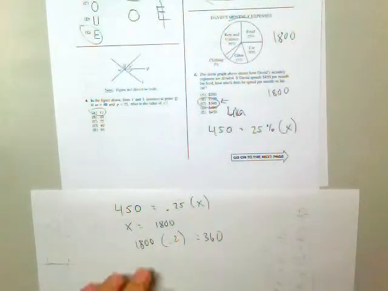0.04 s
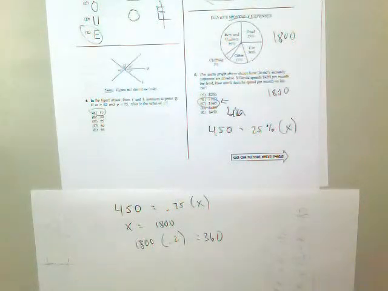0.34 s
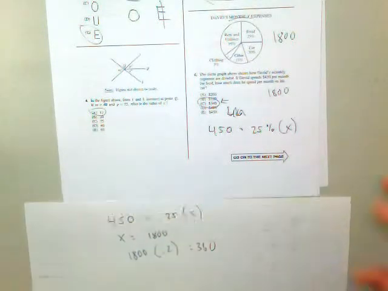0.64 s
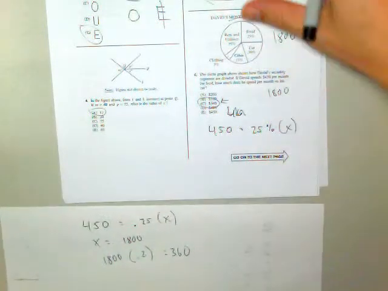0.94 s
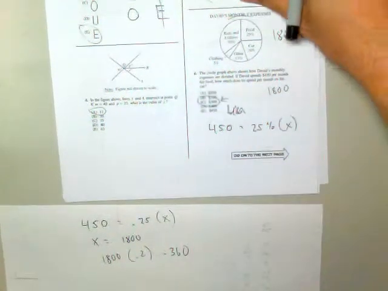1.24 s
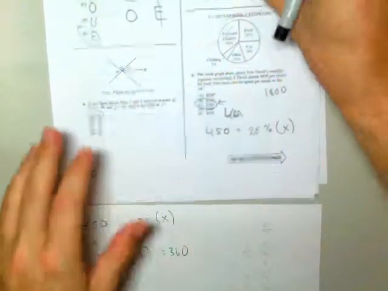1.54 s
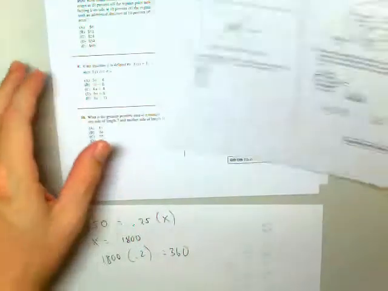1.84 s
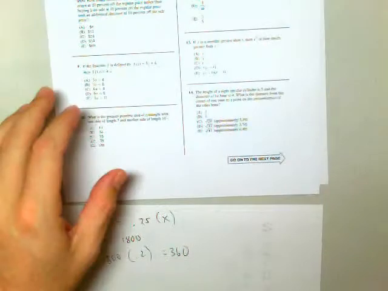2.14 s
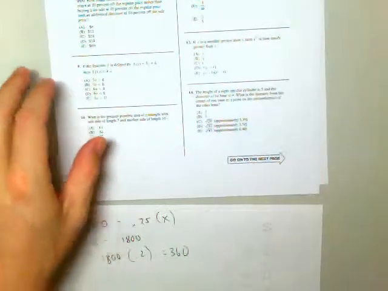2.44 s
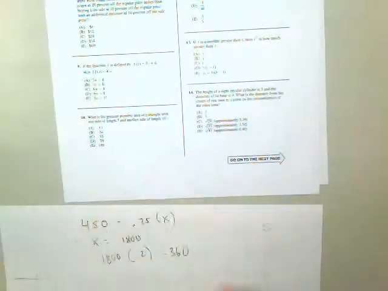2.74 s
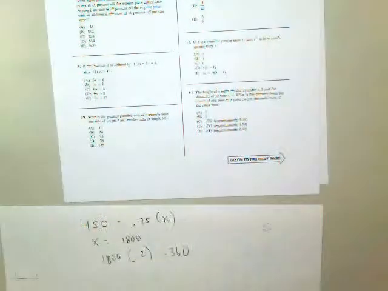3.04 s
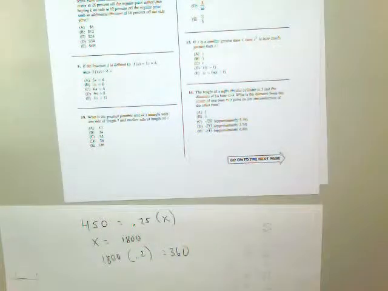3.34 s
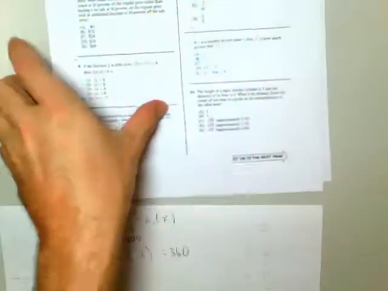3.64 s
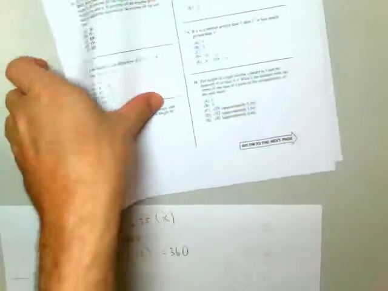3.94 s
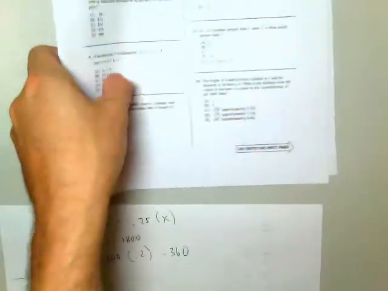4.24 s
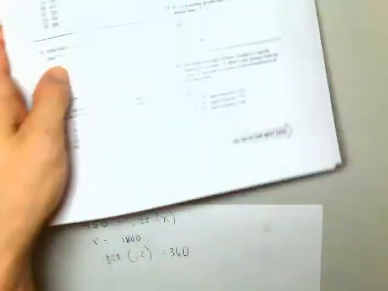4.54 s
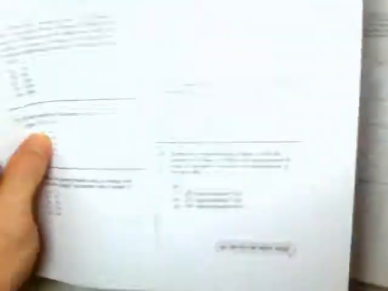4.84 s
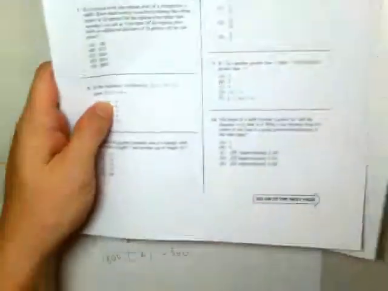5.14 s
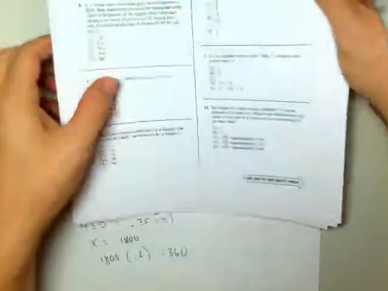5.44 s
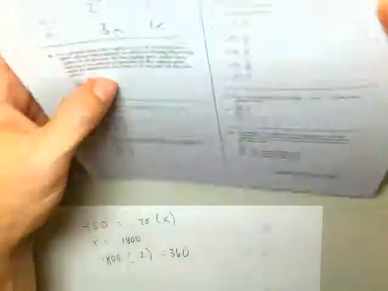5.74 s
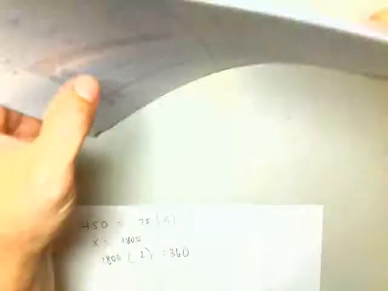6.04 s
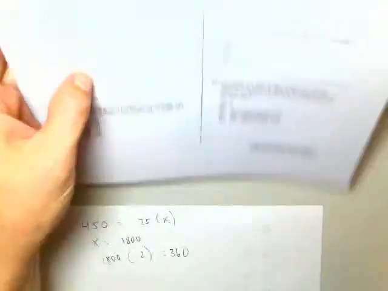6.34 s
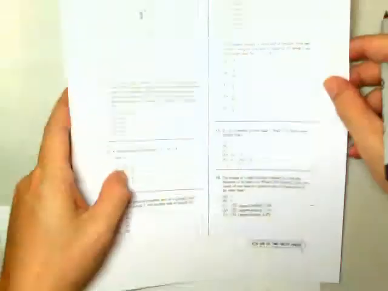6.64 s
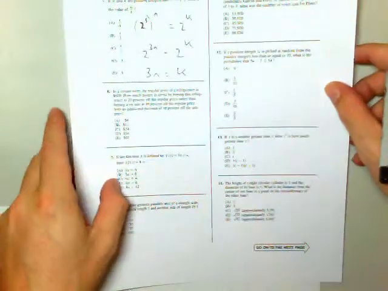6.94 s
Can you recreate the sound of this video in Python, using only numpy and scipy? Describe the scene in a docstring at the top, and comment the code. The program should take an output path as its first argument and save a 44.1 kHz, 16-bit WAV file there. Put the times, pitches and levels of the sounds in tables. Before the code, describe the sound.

Sheets of paper slide and rustle on a desk, with a hand thump and a knock of the stack over a faint hum.

```python
"""Over a faint mains hum, paper ticks and slides across a desk, close up in a small, quiet room.
Sheets are pushed aside and picked up: their fibres hiss and rustle, bent panels snap, skin squeaks.
A hand thumps the desk and shoves the stack into a judder. Near the end the stack is knocked square,
ringing the desk and fanning air at the microphone."""
import sys
import numpy as np
from scipy import signal
from scipy.fft import rfft, irfft, next_fast_len
from scipy.io import wavfile
from scipy.ndimage import uniform_filter1d

SR = 44100
rng = np.random.default_rng(int(sys.argv[2]) if len(sys.argv) > 2 else 0)


def dump_mix(stems):
    """Bounce the given channels to the path in sys.argv[1] as a 16-bit WAV at rate SR."""
    frames = np.atleast_2d(stems).T  # one column per channel
    limited = np.clip(frames, -1, 1)  # hard clip at full scale
    pcm = np.round(limited * 32767).astype(np.int16)
    wavfile.write(sys.argv[1], SR, pcm)


N = 316227
TIME = np.arange(N) / SR
HIT = TIME[:16384]  # time axis of one impact


def undb(db):
    """Decibels to gain."""
    return 10 ** (np.asarray(db) / 20)


def unit(x):
    """Scale to rms 1."""
    return x / np.sqrt(np.mean(x ** 2))


def peak(x):
    """Scale to a peak of 1."""
    return x / np.abs(x).max()


def crest(x):
    """Scale so that the loudest two milliseconds have rms 1."""
    return x / np.sqrt(uniform_filter1d(x ** 2, size=88).max())


def add(out, s, x):
    """Mix x into out from time s."""
    i = int(s * SR)
    out[i:i + len(x)] += x[:N - i]


def colour(x, points):
    """Minimum-phase EQ through (f/Hz, level/dB) points."""
    n = 2 * next_fast_len(len(x) // 2 + 1)
    hz, db = np.transpose(points)
    log_hz = np.log(np.maximum(np.arange(n // 2 + 1) * SR / n, 1))
    gain = undb(np.interp(log_hz, np.log(hz), db))
    cepstrum = irfft(np.log(gain))
    cepstrum[1:n // 2] *= 2
    cepstrum[n // 2 + 1:] = 0
    return irfft(rfft(x, n) * np.exp(rfft(cepstrum)))[:len(x)]


def band(x, low_hz, high_hz, order=2):
    """Band-pass between two edges."""
    return signal.sosfilt(signal.butter(order, [low_hz, high_hz], "band", fs=SR, output="sos"), x)


def grains(count, rate, spread_db):
    """Fibres catching and letting go: random clicks, rate a second, uneven in size."""
    sizes = undb(spread_db * np.minimum(rng.exponential(size=count), 5))
    return unit(rng.standard_normal(count) * sizes * (rng.random(count) < rate / SR))


def walk(rate):
    """Smooth random modulator of rms 1, with rate new targets a second."""
    hold = int(SR / rate)
    steps = np.repeat(rng.standard_normal(N // hold + 1), hold)
    return unit(uniform_filter1d(steps, hold)[:N])


def swell(start, fastest, end, attack_power=1.14, release_power=2.1):
    """Speed of one hand movement: it rises smoothly to 1 and falls back to rest."""
    t = TIME[:int((end - start) * SR)] + start
    arc = np.sin(np.pi / 2 * np.interp(t, [start, fastest, end], [0, 1, 0]))
    return arc ** np.where(t < fastest, attack_power, release_power)


def burst(t, build_s, decay_s):
    """Envelope that grows up to t = 0 and dies away after it."""
    return np.exp(-np.maximum(-t / build_s, t / decay_s))


def ring(modes):
    """Free ringing of (f/Hz, level/dB, t60/s) modes."""
    return sum(undb(db - 60 * HIT / t60) * np.sin(2 * np.pi * hz * HIT) for hz, db, t60 in modes)


def room_tone(mains_hz=60):
    """The bed: mains hum over soft room air, microphone hiss and low rumble."""
    # hum partials: harmonic number, rms level/dB
    partials = [(1, -36.5), (2, -63), (3, -62.5), (5, -66.5), (7, -69.5)]
    # spectrum of air and hiss: f/Hz, level/dB
    air_eq = [(65, -34), (110, -8.5), (181, -6.5), (442, -11), (544, -12), (603, -12.5), (1010, -18),
              (1440, -18), (2140, -23), (3750, -25), (15700, -31.5)]
    hum = sum(np.sqrt(2) * undb(db) * np.sin(2 * np.pi * (k * mains_hz * TIME + rng.random()))
              for k, db in partials)
    air = unit(colour(rng.standard_normal(N), air_eq)) * undb(-52 + 0.063 * walk(4.1))
    rumble = unit(band(rng.standard_normal(N), 5.8, 97)) * undb(-49.5)
    return hum + air + rumble


def ticks(treble_db=-6):
    """A paper edge or fingernail meets the desk: one sharp contact with a brief flutter."""
    # contacts: t/s, peak level/dB
    cues = [(0.466, -36), (1.497, -27.5), (2.052, -16.5), (2.074, -19.5), (2.155, -24.5), (2.858, -33.5),
            (3.722, -15.5), (4.002, -30.5), (4.095, -19), (5.645, -29), (5.867, -32.5), (6.308, -20),
            (6.345, -8), (6.952, -31.5)]
    out = np.zeros(N)
    for s, db in cues:
        contact = undb(-17) * rng.standard_normal(len(HIT)) * np.exp(-HIT / 0.003)
        contact[0] += 1
        knock = peak(band(contact, 410, 1890))
        click = peak(band(contact, 4000, 7400, order=1))
        add(out, s, undb(db) * peak(knock - undb(treble_db) * click))
    return out


def flicker(x, depth_db=3.0, rate=55):
    """Each octave from 1 to 16 kHz swells and fades on its own as the contact patch moves."""
    spectrum = rfft(x)
    octave = np.log2(np.maximum(np.arange(N // 2 + 1) * SR / N, 1) / 1000)
    bands = (irfft(spectrum * np.maximum(1 - np.abs(octave - k), 0), N) for k in range(5))
    return unit(sum(part * undb(depth_db * walk(rate)) for part in bands))


def whistle():
    """A thin, patchy whistle of narrow-band noise rides on the opening slides."""
    # fader points: t/s, level/dB
    fader = [(.5, -73), (.6, -66), (1.6, -65), (2.1, -63)]
    times, db = np.transpose(fader)
    gain = undb(np.interp(TIME, times, db, left=-150, right=-150))
    tone = unit(band(rng.standard_normal(N), 6330, 6520))
    return tone * gain * unit(undb(-1.5 * walk(15.1)))


def sliding(kink_db=-9.5, blur_db=-48):
    """Fibre friction hisses with the speed of each stroke; the free part of the sheet rustles."""
    # strokes of a sheet: start/s, fastest/s, end/s, hiss/dB, rustle/dB, rustle pitch/Hz
    strokes = [(0.499, .59, 0.78, -54, -55.5, 3800), (0.683, 0.822, 1.21, -53.5, -59.5, 1600),
               (1.305, 1.362, 1.53, -61, -42.5, 3130), (1.301, 1.467, 1.604, -38, -51, 1490),
               (1.478, 1.64, 2.01, -46, -53.5, 2610), (1.679, 2.0, 2.45, -50, -51, 1480),
               (2.061, 2.08, 2.42, -62, -48.5, 630), (2.856, 2.858, 3.23, -58, -57.5, 1100),
               (3.718, 3.708, 3.95, -47, -42.5, 4340), (3.992, 4.05, 4.36, -48.5, -54, 1000),
               (4.151, 4.39, 4.754, -41.5, -43.5, 1540), (5.022, 5.026, 5.29, -44.5, -67, 950),
               (4.851, 5.18, 5.47, -56.5, -48.5, 845), (5.168, 5.181, 5.404, -36, -45, 2130),
               (5.36, 5.47, 5.69, -48, -48, 1230), (5.622, 5.71, 5.86, -44.5, -52, 930),
               (5.866, 5.863, 6, -51, -58, 1500), (6.198, 6.28, 6.49, -46.5, -49, 2610),
               (6.523, 6.593, 6.75, -52, -51.5, 800), (6.713, 6.764, 7.15, -56.5, -60.5, 1070)]
    # spectrum of paper friction: f/Hz, level/dB
    hiss_eq = [(1060, -40), (1800, -4), (2320, -1), (2780, -2), (2910, -1.5), (3620, 3.5), (5150, 1),
               (6290, 1.5), (7140, -4.5), (8400, 1), (9540, -4), (10900, 2), (13500, -12.5), (15700, -4)]
    speed, rustle = np.zeros(N), np.zeros(N)
    for start, fastest, end, hiss_db, rustle_db, hz in strokes:
        motion = swell(start, fastest, end)
        fibres = grains(N, rate=3000, spread_db=2.5)[:len(motion)]
        add(speed, start, undb(hiss_db) * motion)
        add(rustle, start, undb(rustle_db) * motion * unit(band(fibres, hz * 0.64, hz * 1.31)))
    crackle = grains(N, rate=2000, spread_db=0)
    crackle += undb(kink_db) * grains(N, rate=70, spread_db=4.5)  # single kinks let go
    hiss = grains(N, rate=20000, spread_db=-1)
    # slow sliding crackles grain by grain; fast sliding blurs into a hiss
    blur = speed / (speed + undb(blur_db))
    friction = np.sqrt(blur) * hiss + np.sqrt(1 - blur) * crackle
    whistling = whistle()
    grip = undb(0.31 * walk(70))
    return grip * (speed * flicker(colour(friction, hiss_eq)) + rustle + whistling)


def squeaks(wobble=0.01534):
    """Skin sticks and slips evenly for a moment and sings, slightly unsteady in pitch."""
    # squeaks: t/s, level/dB, half length/s, f/Hz
    cues = [(0.87, -35, 0.0089, 225), (0.93, -53, 0.028, 1570), (3.777, -23, 0.015, 1050),
            (3.846, -39, 0.0087, 1040), (4.1, -31.5, .015, 1060)]
    warped_time = np.cumsum(1 + wobble * walk(200)) / SR
    return sum(undb(db) * np.exp(-((TIME - s) / length) ** 2) * np.sin(2 * np.pi * hz * warped_time)
               for s, db, length, hz in cues)


def puffs(low_hz=27.73, high_hz=68, eddies_db=-9):
    """A flapping sheet sends slow pressure swings and some turbulence over the microphone."""
    # pushes of air: start/s, fastest/s, end/s, level/dB
    cues = [(1.168, 1.206, 1.4, -32), (1.288, 1.57, 2.18, -36), (3.975, 4.085, 4.57, -30),
            (6.142, 6.22, 6.49, -17), (6.264, 6.33, 6.44, -21), (6.774, 6.82, 7.06, -35.5)]
    flow = np.zeros(N)
    for start, fastest, end, db in cues:
        add(flow, start, undb(db) * swell(start, fastest, end))
    hz = np.sqrt(low_hz * high_hz) * (high_hz / low_hz) ** (np.tanh(walk(40)) / 2)
    swings = np.sqrt(2) * np.sin(2 * np.pi * np.cumsum(hz) / SR)
    eddies = unit(band(rng.standard_normal(N), 49, 120))
    return flow * (swings + undb(eddies_db) * eddies)


def snaps(build_cycles=4.15, decay_cycles=6.9, lead_s=0.05):
    """A crease crackles through the sheet and the panel beside it pops over; large panels are slower."""
    # buckles: t/s, panel peak/dB, panel pitch/Hz, crackle relative to panel/dB
    cues = [(1.672, -4, 3000, -10), (1.674, -10.5, 1280, -31), (1.699, -18.5, 1300, -24),
            (1.821, -21.5, 1500, -17), (2.697, -44, 1090, -27), (4.1263, -22.5, 1500, -1.5),
            (4.1853, -7, 2100, -15), (4.199, -11, 1560, -34), (4.2421, -14.5, 1430, -3),
            (4.415, -14, 1570, -13), (4.6751, -33.5, 780, -19), (5.069, -26, 880, -22),
            (5.187, -22.5, 920, -14), (5.424, -30.5, 1060, -26), (5.918, -25, 1290, -39),
            (6.327, -13, 1130, -17.5), (6.608, -27, 800, -19.5), (6.739, -30, 1060, -13.5)]
    out = np.zeros(N)
    t = HIT - lead_s
    for s, db, hz, crackle_db in cues:
        pop = burst(t, build_cycles / hz, decay_cycles / hz) * grains(len(t), rate=14000, spread_db=1.56)
        crease = burst(t, build_s=0.002, decay_s=0.0026) * grains(len(t), rate=11000, spread_db=1.5)
        panel = peak(band(pop, hz * 0.64, hz * 1.37))
        crease = band(crease, 1900, 6500, order=1)
        crackle = crest(band(crease, 1450, 15500))
        add(out, s - lead_s, undb(db) * (panel + undb(crackle_db) * crackle))
    return out


def thumps():
    """A soft hand or the paper's weight pushes the desk into its modes; a longer contact is duller."""
    # landings: t/s, level/dB, contact time/s
    cues = [(2.074, -32, 0.00075), (3.723, -5.5, 0.00066), (3.7367, 1.5, 0.004), (3.767, -9, 0.0021),
            (5.489, -29, 0.0066), (6.2, -15, .001), (6.327, -13, 0.012), (6.779, -27, 0.0027)]
    # modes of the desk top: f/Hz, level/dB, t60/s
    desk_modes = [(65.6, -15.5, 0.97), (115.5, 5.5, 0.19), (146, -1.5, 0.13), (183.2, -1, 0.17),
                  (207.6, -9, 0.36), (298.3, -8, 0.27), (418, -24, 0.65), (496, -30, .3), (605, -50, .3),
                  (730, -28, 0.37), (1000, -37, .2)]
    out, desk = np.zeros(N), ring(desk_modes)
    for s, db, contact_s in cues:
        push = HIT * np.exp(-4 * HIT / contact_s)
        motion = signal.fftconvolve(push, desk)[:len(HIT)]
        thud = band(motion, 89, 4000, order=1)  # the desk radiates little of its slowest motion
        add(out, s, undb(db) * crest(thud))
    return out


def drag(rumble_db=2.5, linger_s=0.078):
    """Stick-slip jolts of the pressed stack rattle the paper and leave the desk rumbling."""
    # shoves of the hand: start/s, fastest/s, end/s, level/dB
    shoves = [(3.721, 3.725, 3.75, -23), (3.744, 3.779, 3.922, -25), (4.036, 4.082, 4.167, -30)]
    # spectrum of the juddering stack: f/Hz, level/dB
    judder_eq = [(150, -18.5), (260, 3.5), (355, -4.5), (410, 3.5), (524, -4), (593, -0.5), (802, -6),
                 (1040, -7), (1160, -12.5), (1470, -14), (2500, -32), (3250, -69), (5500, -120)]
    effort = np.zeros(N)
    for start, fastest, end, db in shoves:
        add(effort, start, undb(db) * swell(start, fastest, end))
    retained = np.exp(-1 / (linger_s * SR))  # share of the desk's energy left after one sample
    shaking = np.sqrt(signal.lfilter([1 - retained], [1, -retained], effort ** 2))
    slips = grains(N, rate=1500, spread_db=1)
    judder = unit(colour(slips, judder_eq)) * effort
    rumble = unit(band(slips, 66, 197, order=3)) * shaking * undb(rumble_db)
    return judder + rumble


def knocks(ring_db=-21):
    """The sheets of the stack land one after another, a dense clap that leaves the desk ringing."""
    # landings of the stack's edge: t/s, level/dB, decay/s
    cues = [(6.1837, -4.5, 0.0032), (6.188, -2.5, 0.0043), (6.194, -14, 0.026)]
    # spectrum of the clap: f/Hz, level/dB
    clap_eq = [(130, -25), (220, -7), (310, 1), (430, -8), (540, -2), (850, -7), (1200, -0.5), (1500, -6.5),
               (1900, -17.5), (2350, -16), (3200, -22), (4600, -21), (7500, -36.5), (15000, -43.5)]
    # ring after the clap: f/Hz, level/dB, t60/s
    modes = [(300, 0.5, 0.21), (540, -10, 0.15), (713, 7, .25), (1019.5, -4, .14), (1120, -6, .18),
             (1206, 0, 0.12), (1410, -3, 0.13), (2350, -18, .16)]
    out = np.zeros(N)
    for s, db, decay_s in cues:
        edges = grains(len(HIT), rate=8000, spread_db=2) * np.exp(-HIT / decay_s)
        add(out, s, undb(db) * crest(colour(edges, clap_eq)))
    add(out, cues[0][0], undb(ring_db) * crest(ring(modes)))
    return out


def room(x, low_t60=0.24, high_t60=0.16, wet_db=-12):
    """The desk mirrors the sound at once; near walls add a short tail that loses its treble first."""
    tail = rng.standard_normal(len(HIT)) * (1 - np.exp(-HIT / 0.00058))
    low = band(tail, 197, 2550) * undb(-60 * HIT / low_t60)
    high = band(tail, 1470, 19845) * undb(-60 * HIT / high_t60)
    response = low + undb(-2.5) * high
    response *= undb(wet_db) / np.sqrt(np.sum(response ** 2))
    response[int(0.0019 * SR)] += undb(-24.5)  # bounce off the desk
    return x + signal.fftconvolve(x, response)[:N]


def scene():
    """Mono mix: paper handling through the room; thumps, puffs and room tone stay dry."""
    handling = sliding() + snaps() + ticks() + drag() + squeaks() + knocks()
    return (room(handling) + thumps() + puffs() + room_tone())[None]


def record(dry, top_hz=15800):
    """The loudest blows clip the input; a steep low-pass cuts the top."""
    lowpass = signal.ellip(10, 0.1, 70, top_hz, fs=SR, output="sos")
    return signal.sosfilt(lowpass, np.clip(dry, -1, 1))


dry = scene()
out = record(dry)
dump_mix(out)
```